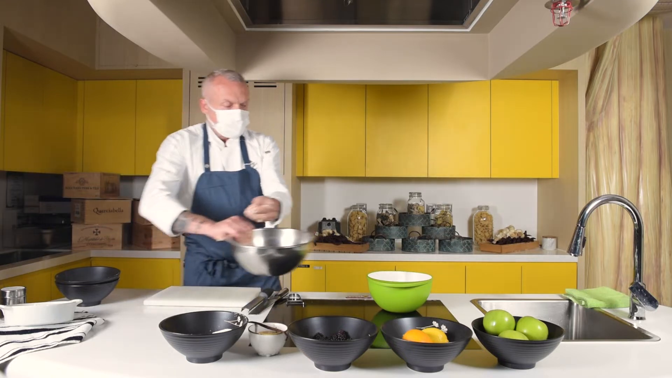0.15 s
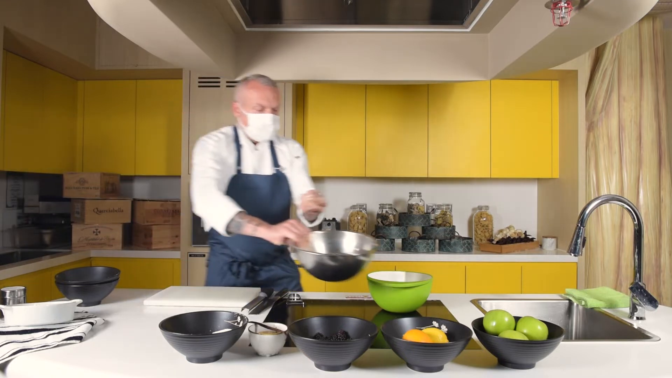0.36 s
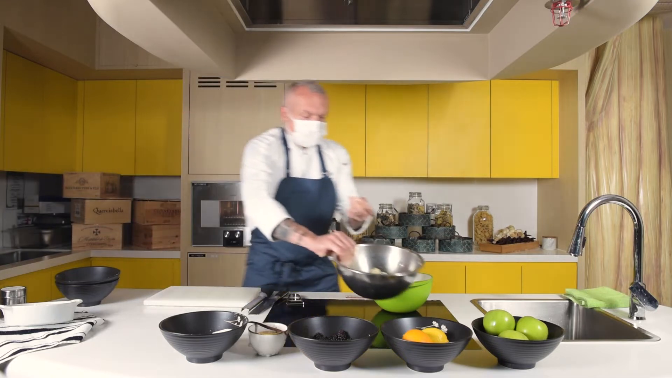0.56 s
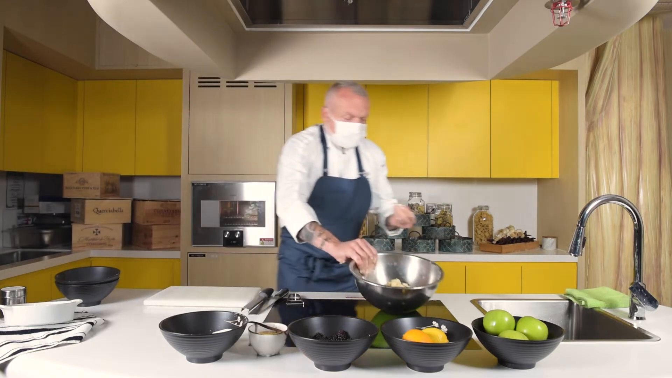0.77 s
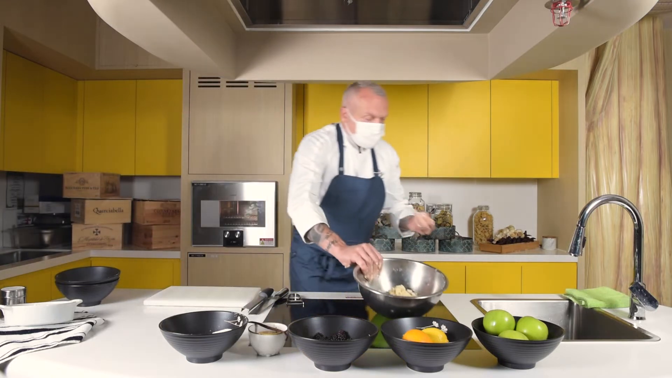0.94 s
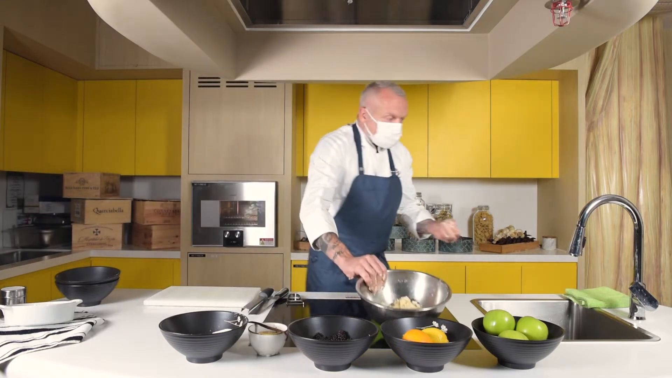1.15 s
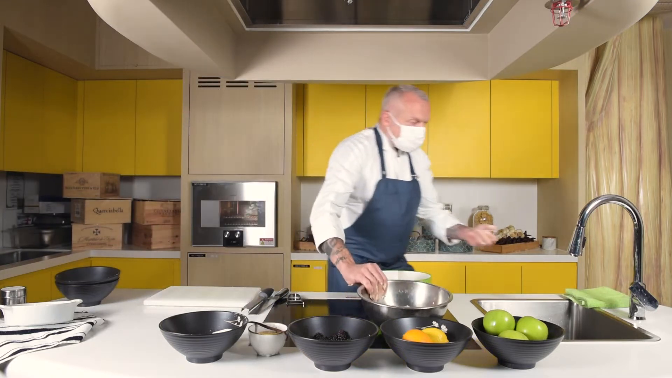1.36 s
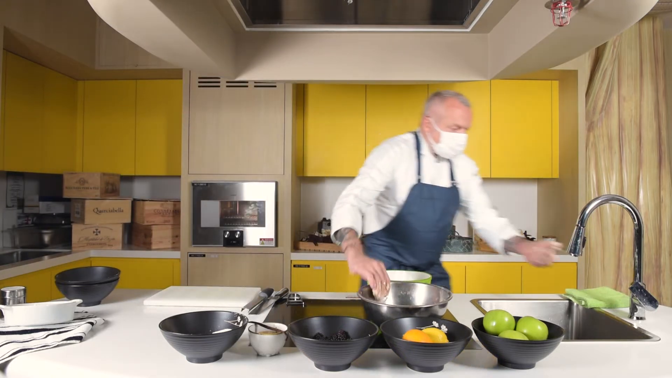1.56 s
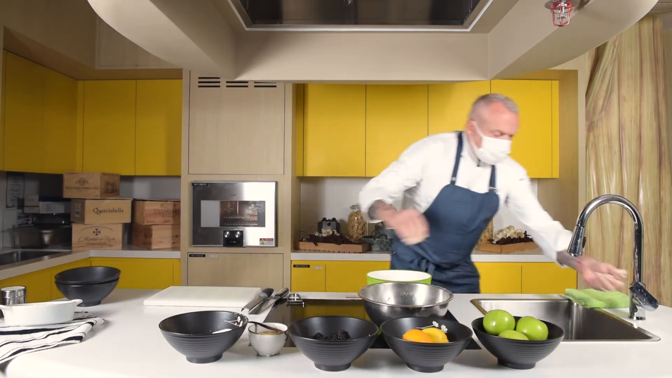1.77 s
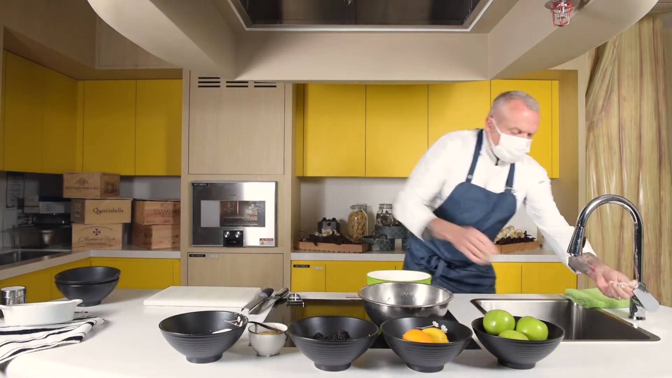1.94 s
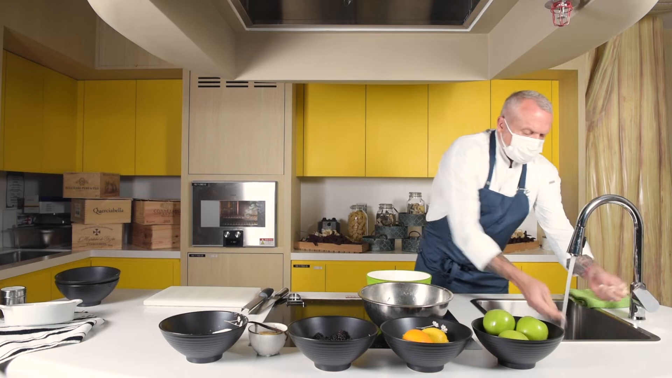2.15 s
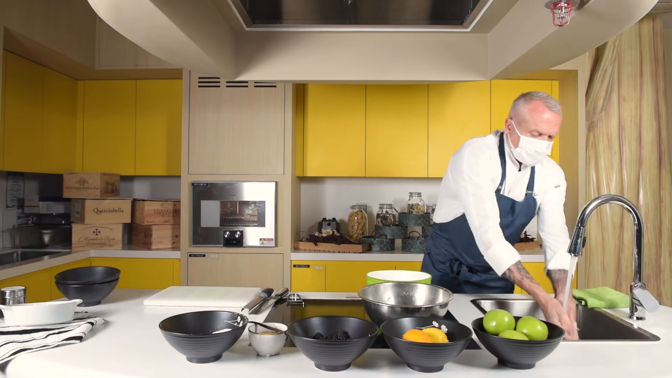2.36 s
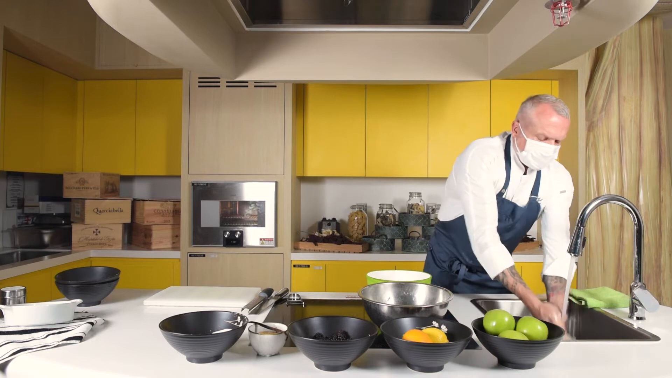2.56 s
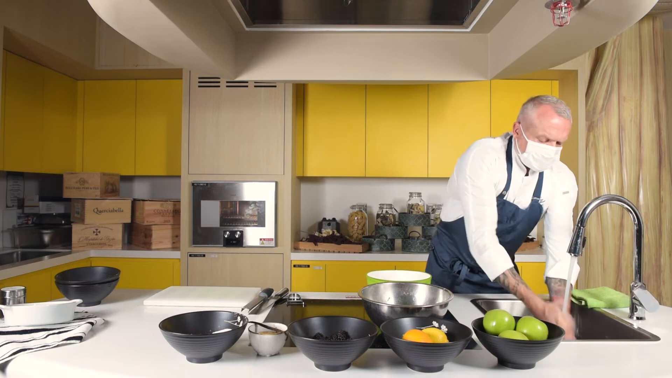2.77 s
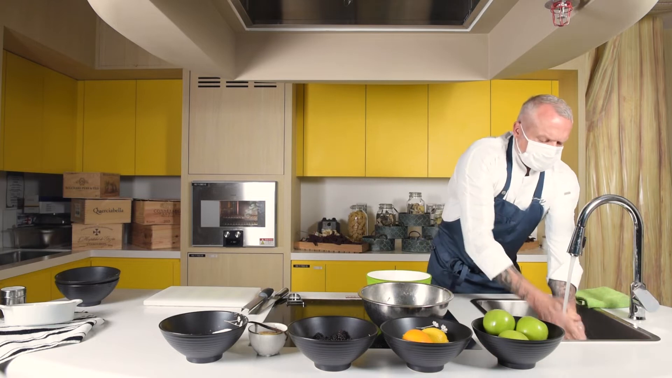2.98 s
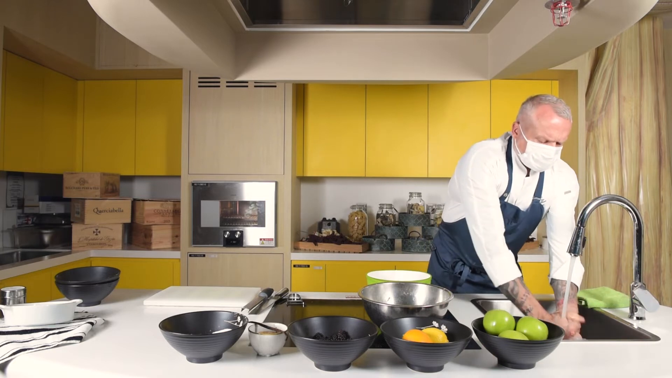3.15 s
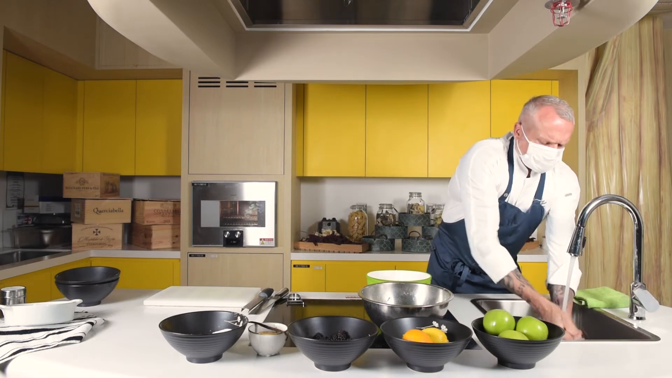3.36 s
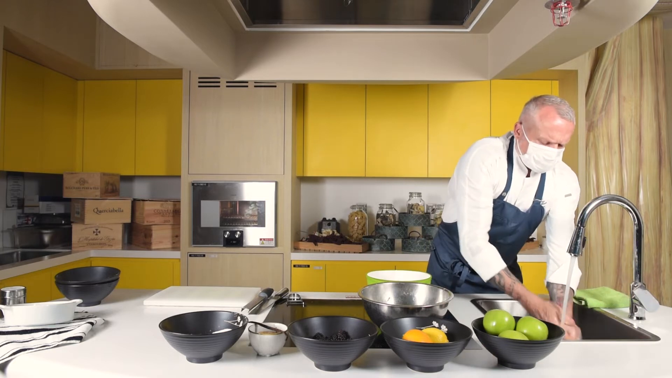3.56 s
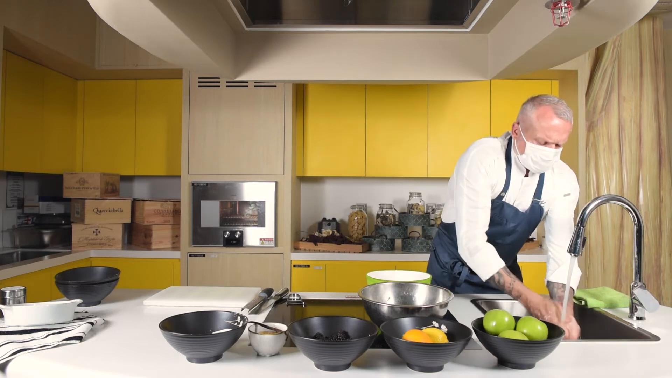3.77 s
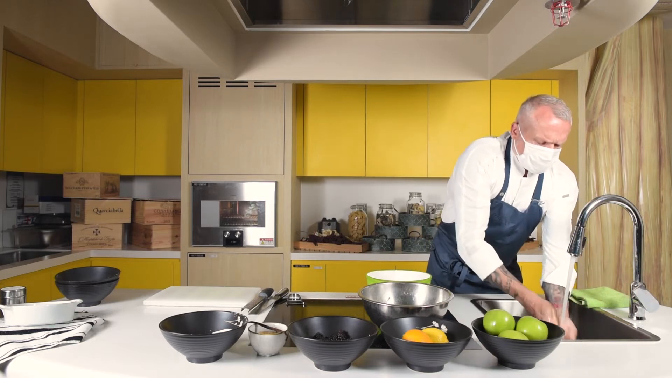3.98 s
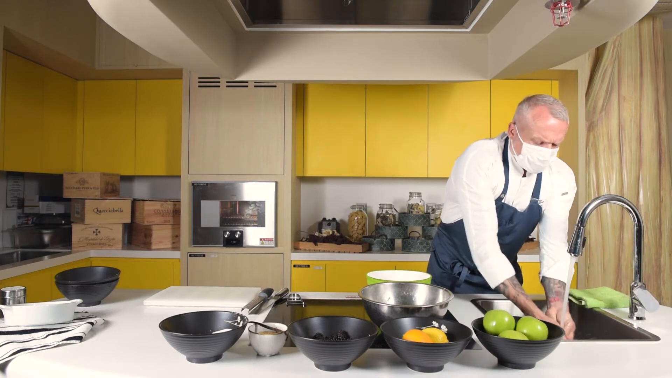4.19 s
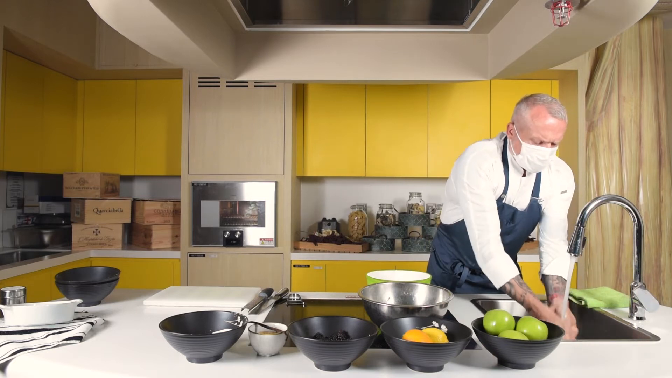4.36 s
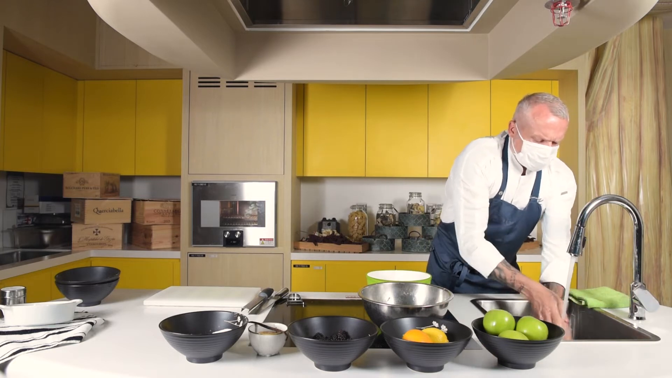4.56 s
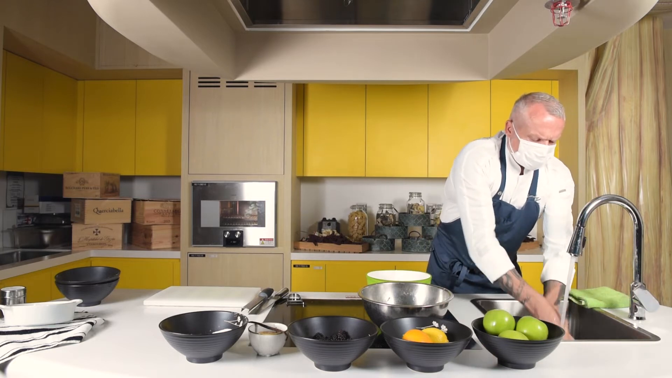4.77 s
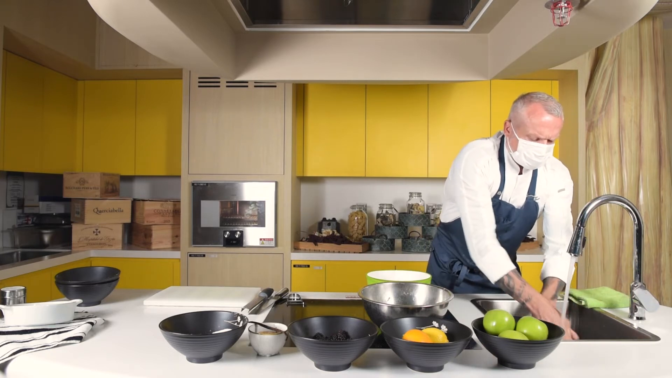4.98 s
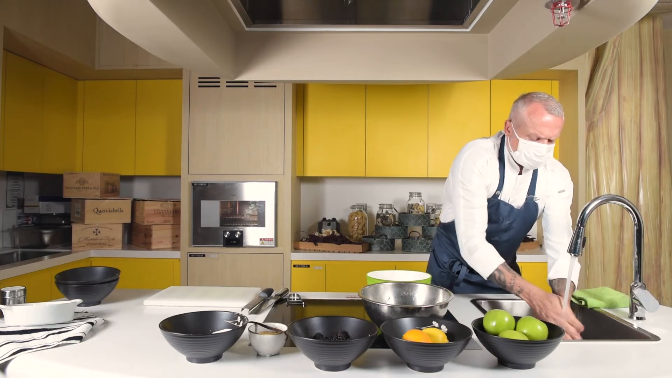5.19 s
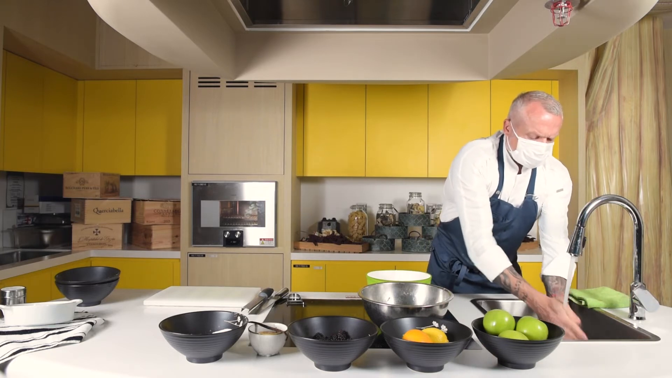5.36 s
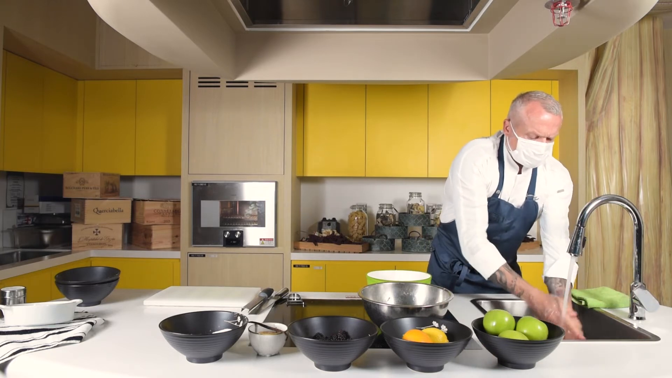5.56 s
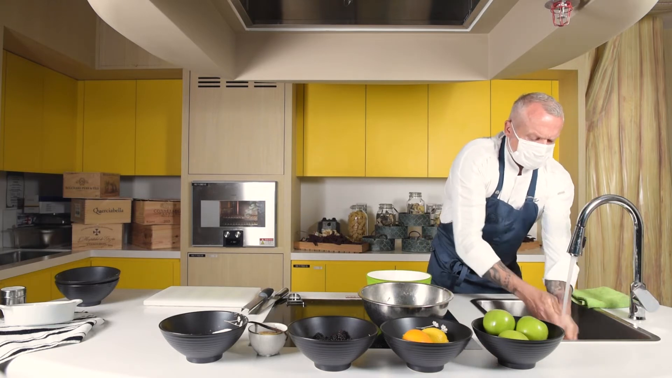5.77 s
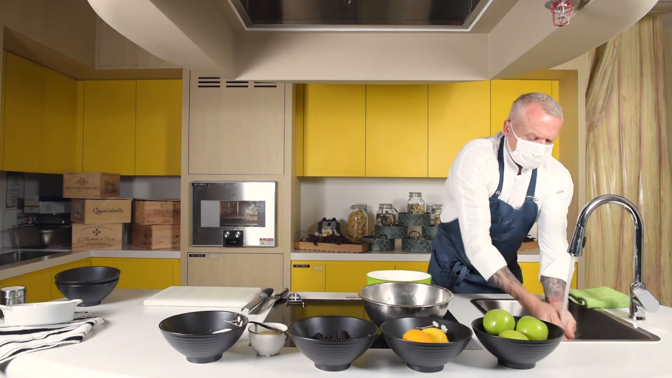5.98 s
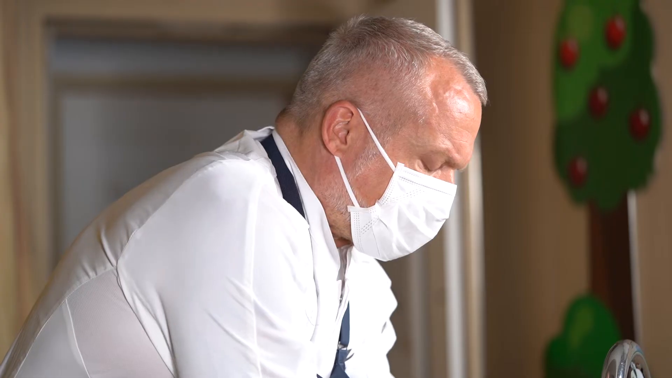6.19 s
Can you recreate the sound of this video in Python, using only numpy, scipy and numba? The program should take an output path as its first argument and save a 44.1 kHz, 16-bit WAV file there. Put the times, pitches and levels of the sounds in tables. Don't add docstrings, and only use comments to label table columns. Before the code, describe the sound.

A faint low ventilation rumble fills a hard-walled kitchen, with slight cloth rustles at the start. At about 0.6 s a steel bowl gets two small taps, then a dull ringing knock at 0.65 that rocks back and forth until 0.8. A lighter tap comes at 0.95. At 1.23 the bowl slams onto stone, by far the loudest event: a clipped, crunchy clang with tiny chattering bounces, a short low-mid ring and grainy room echo, cut off by about 1.8. Near quiet follows. Around 1.95 a tap begins to hiss, with small lever thuds; at 2.2 the jet slaps the steel basin sharply. Until the end at about 6.2 s, much quieter than the slam, thin bright water runs in flickering suppressed bands, with mist, ticking drops and soft thuds as hands rinse; stronger splashes come near 3.15, 4.2 and 5.6, and a last thump at 6.2.

```python
import sys
import numpy as np
from scipy import signal
from scipy.fft import rfft, irfft, next_fast_len
from scipy.io import wavfile
from scipy.ndimage import uniform_filter1d
from numba import njit

SR = 44100
rng = np.random.default_rng(int(sys.argv[2]) if len(sys.argv) > 2 else 0)


def waveform_to_disk(signal):
    frames = np.transpose(np.atleast_2d(signal))
    scaled = np.clip(frames, -1, 1) * 32767
    samples = np.round(scaled).astype(np.int16)
    wavfile.write(sys.argv[1], SR, samples)


def undo_db(level):
    steps = np.asarray(level, float) / 20
    return 10 ** steps


N = 274743


def rms1(x):
    return x / np.sqrt(np.mean(x ** 2))


def unit_energy(x):
    return x / np.sqrt(np.sum(x ** 2))


def shaped(x, gain_at):
    size = next_fast_len(len(x))
    hz = np.arange(size // 2 + 1) * SR / size + 1
    return irfft(rfft(x, size) * gain_at(hz), size)[:len(x)]


def band(x, lo_hz, hi_hz, skirt=0.012):
    def gain_at(f):
        inside = np.minimum(np.log(f / lo_hz), np.log(hi_hz / f))
        return np.clip(inside / skirt / 2 + .5, 0, 1)
    return shaped(x, gain_at)


def colour(table):
    hz, db = np.transpose(table)
    return lambda f: undo_db(np.interp(np.log(f), np.log(hz), db))


def fade(t, t60):
    return np.exp(-np.log(1000) * t / t60)


def add(out, s, x):
    i = int(s * SR)
    out[i:i + len(x)] += x[:N - i]


def walk(rate):
    k = int(SR / rate)
    held = np.repeat(rng.standard_normal(N // k + 1), k)
    return uniform_filter1d(uniform_filter1d(held, k), k)[:N]


def curve(table):
    return np.interp(np.arange(N) / SR, *np.transpose(table))


def swell(s, db, rise, fall):
    t = np.arange(0, N, 64) / SR - s
    return undo_db(db - 20 * np.where(t < 0, -t / rise, t / fall)) ** 2


@njit
def grains(start, hz, cycles, size, glide):
    out = np.zeros(N + 4000)
    for k in range(len(start)):
        step = 2 * np.pi * hz[k] / SR
        keep = np.exp(-hz[k] / SR / cycles[k])
        level, phase = size[k], 0.
        for i in range(min(3999, int(5 * cycles[k] * SR / hz[k]))):
            phase += step
            step = min(step * (1 + glide * hz[k] / SR / cycles[k]), 2.6)
            level *= keep
            out[start[k] + i] += level * np.sin(phase)
    return out[:N]


# lower edge of the band in Hz, time to fall 60 dB in seconds.
KITCHEN_DECAY = [(25, 0.11), (90, 0.42), (180, 0.52), (360, 0.53), (580, 0.51), (800, 0.49), (1500, 0.5),
                 (3000, 0.529), (4750, 0.48), (6000, 0.38), (7600, 0.32), (9600, 0.27), (12200, 0.18),
                 (18000, .1)]


def echoes(kept=1.):
    t = np.arange(SR) / SR
    noise = rng.standard_normal(SR)
    tail = 0
    for (lo, t60), (hi, _) in zip(KITCHEN_DECAY, KITCHEN_DECAY[1:]):
        tail = tail + band(noise, lo, hi, skirt=0.057) * fade(t, kept * t60)
    return tail * (1 - np.exp(-t / 0.0066))


def kitchen(x, kept=0.932):
    return signal.fftconvolve(x, unit_energy(echoes(kept)))[:N]


# frequency in Hz, level in dB per Hz.
AIR_COLOUR = [(20, -30), (50, -24), (80, -21.5), (100, -6.5), (250, 0), (420, -10), (600, -11.5),
              (1160, -14.5), (2060, -24), (4500, -29.5), (5200, -38.5), (15800, -44.5)]
# time in seconds, level in dB.
STIR = [(0.0, -2), (.25, 2), (.7, 3), (1.1, -1), (1.7, -3.5), (2.24, 0), (2.53, 0), (2.81, 1.5),
        (3.0, -1.5), (3.34, 3), (3.57, -0.5), (3.9, 2.5), (4.68, -0.4), (5.2, 2), (5.43, -1), (5.6, 7),
        (5.9, 0.5), (6.23, 2.5)]


def air():
    stir = curve(STIR)
    noise = shaped(rng.standard_normal(N), colour(AIR_COLOUR))
    upper = band(noise, 320, 16000, skirt=0.053)
    out = undo_db(-53 + stir + 2.9 * walk(9)) * rms1(noise - upper)
    out = out + undo_db(-53 + 0.68 * stir + 3.3 * walk(9.7)) * rms1(upper)
    t = np.arange(SR // 8) / SR
    brush = np.hanning(len(t))
    rustles = [(.146, -61.5, 5940, 7860, fade(t, 0.062)), (.57, -62.5, 3800, 15800, brush),
               (1.075, -67, 5900, 7200, brush)]
    for s, db, lo_hz, hi_hz, shape in rustles:
        add(out, s, undo_db(db) * rms1(band(rng.standard_normal(len(t)), lo_hz, hi_hz)) * shape)
    return out


# pitch in Hz, level in dB, time to fall 60 dB in seconds.
RIM = [(40, -19.5, .2), (144, -12, 0.099), (652, 1, 0.064), (770, 3, 0.01), (666, -12, 0.12),
       (854, 4, 0.085), (1293, -22, 0.048), (1400, -12.5, 0.245), (1530, 1, 0.021), (2110, 2.5, 0.02),
       (2820, -10.5, 0.041)]
# pitch in Hz, level in dB, time to fall 60 dB in seconds.
ROCK = [(153, 0.5, 0.13), (540, 1.5, 0.087), (507, -8.5, 0.22), (570, -9.5, 0.38), (613, -14.5, 0.26),
        (677, -16.5, .3), (1747, -19, 0.084)]
# pitch in Hz, level in dB, time to fall 60 dB in seconds.
TAP = [(55.7, -18, 0.2), (150, -13.5, 0.16), (646.7, 7, 0.068), (610, -8.5, 0.3), (681, -4, 0.18),
       (767, 0, 0.045), (861, -9.5, 0.15), (1100, -31, 0.071), (1300, -19, 0.12), (1444, -17, .1),
       (1550, -24, 0.068)]
# pitch in Hz, level in dB, time to fall 60 dB in seconds.
BASE = [(64.75, -15.5, 0.1), (126.8, -13, 0.28), (171.2, 0.5, 0.27), (253.6, 1, 0.28), (282, -8.5, 0.36),
        (332.3, -2, .28), (432.8, -1, .3), (471, -6.5, 0.391), (518.6, 0.5, 0.12), (588, -7.5, .33),
        (647, 0, 0.28), (622.5, -17.5, 0.6), (542, -20, 0.47), (721.4, -12, 0.41), (821, -7.5, .25)]
WOBBLE_DB, WOBBLE_PER_S, WOBBLE_GROWS_S = 3.5, 45, 0.027


def ringing(modes, attack_ms, flutter, hard):
    t = np.arange(SR) / SR

    def loose():
        start = rng.integers(N - SR)
        return flutter[start:start + SR] * np.minimum(t / WOBBLE_GROWS_S, 1)

    depth_db = WOBBLE_DB * (1.25 if hard else 1)
    wander_cycles = 0.1 if hard else 0.12
    ring = 0
    for k, (hz, db, t60) in enumerate(modes):
        sign = (-1) ** k if hard else 1
        level = sign * undo_db(db + depth_db * loose())
        ring = ring + level * np.sin(2 * np.pi * (hz * t + wander_cycles * loose())) * fade(t, t60)
    return ring * (1 - np.exp(-t * 1000 / attack_ms)) ** 2


def contact_noise(crack_db, room_db, kept, grit):
    click = rng.standard_normal(SR) * fade(np.arange(SR) / SR, 0.069)
    noise = undo_db(crack_db) * click + undo_db(room_db) * echoes(kept)
    cepstrum = irfft(np.log(colour(grit)(np.arange(1025) * SR / 2048 + 1)))
    cepstrum[1:1024] *= 2
    cepstrum[1025:] = 0
    response = irfft(np.exp(rfft(cepstrum)))
    return signal.fftconvolve(noise, unit_energy(response))[:SR]


# frequency in Hz, level in dB.
LINGER = [(70, -13.5), (300, -8), (480, 3), (760, 4), (900, -0.5), (4700, -14.5), (5100, -18), (12000, -19)]


def late_echoes():
    t = np.arange(SR) / SR
    rattle = undo_db(1.5 * walk(190)[:SR])
    builds = 1 - np.exp(-(t / 0.075) ** 2)
    return undo_db(13) * rattle * shaped(echoes(0.93), colour(LINGER)) * builds


# start in seconds, level in dB, top frequency in Hz.
CHATTER = [
    (1.226, 0.5, 15100),
    (1.2325, 4, 14000),
    (1.2385, -0.5, 12000),
    (1.2512, -6.5, 6000),
    (1.262, -9.5, 7990),
    (1.273, -5.5, 6000),
]


def chatter(out):
    t = np.arange(SR // 8) / SR
    for s, db, top_hz in CHATTER:
        noise = rng.standard_normal(len(t))
        burst = shaped(noise, lambda f: f / (f + 2500) / (1 + (f / top_hz) ** 4))
        add(out, s, undo_db(db) * burst * fade(t, .014))


def rim_hum(out):
    swell_s, hz = 0.062, 680
    t = np.arange(int(swell_s * SR)) / SR
    hum = rms1(band(rng.standard_normal(len(t)), hz - 70, hz + 70, skirt=.12))
    add(out, 1.16, undo_db(-32) * hum * (t / swell_s) ** 1.5)


# frequency in Hz, level in dB per Hz.
KNOCK = [(30, -15.5), (60, -6.5), (150, -7.5), (320, -25), (620, 1.5), (870, -7), (1050, -16.5), (1500, -5),
         (2200, -13), (3600, -23), (4000, -33.5), (16000, -57)]
# frequency in Hz, level in dB per Hz.
CRACK = [(30, -40), (150, -8.5), (265, -2.5), (630, 1.5), (1040, -6.5), (2000, -13.5), (4410, -17.5),
         (5000, -28.5), (9000, -27.5), (16000, -32)]
# start in seconds, ring level in dB, crack level in dB, room level in dB,
# share of the room echo's length that the suppressor keeps.
BLOWS = [
    (0.594, -40, -49.5, -41.5, 0.57),
    (0.625, -45.5, -43, -37, .6),
    (0.6493, -7.5, -21, -18, 0.71),
    (0.701, -17, -58, -26, 0.42),
    (.729, -10.5, -43, -35, 0.27),
    (.795, -25.5, -54, -54, .4),
    (0.9548, -19.5, -53, -44, 0.83),
    (1.2256, 11.5, 12.5, 10, 0.64),
]


def bowl():
    t, out = np.arange(SR) / SR, np.zeros(N)
    flutter = walk(WOBBLE_PER_S)
    rim, rock, tap, base = (RIM, 0.29), (ROCK, 1.75), (TAP, 1), (BASE, .06)  # modes, contact time in ms
    touches = [tap, tap, rim, rock, rock, rock, tap, base]
    for (s, ring_db, crack_db, room_db, kept), touch in zip(BLOWS, touches):
        hard = touch is base
        noise = contact_noise(crack_db, room_db, kept, CRACK if hard else KNOCK)
        blow = undo_db(ring_db) / 2 * ringing(*touch, flutter, hard) + noise
        if hard:
            gate = np.clip((0.568 - t) / 0.1554, 0, 1)
            blow = (blow + late_echoes()) * gate
        else:
            top_hz = 1800 if touch is tap else 3800
            low_pass = signal.butter(5, top_hz, fs=SR, output="sos")
            blow = signal.sosfilt(low_pass, blow) + undo_db(-17.5) * noise
        add(out, s, blow)
    chatter(out)
    rim_hum(out)
    return out


# start in seconds, level in dB, pitch in Hz,
# time to fall 60 dB in seconds.
THUDS = [(0.601, -24.5, 243.2, 0.0656), (.6092, -26, 243.2, 0.042), (.6255, -23, 592, 0.017),
         (.6428, -21, 742, .018), (0.741, -25, 226, 0.165), (.79, -30.5, 135.1, 0.12),
         (2.053, -34.5, 511, 0.1), (2.072, -32.5, 530, 0.075), (2.059, -34, 326, 0.075),
         (2.071, -37.5, 238, 0.078), (2.21, -42, 108, 0.19), (2.8, -34.5, 279, 0.15),
         (3.336, -37, 177, 0.27), (3.401, -32.5, 150, 0.14), (3.868, -35.5, 191.3, 0.16),
         (3.907, -36, 201, .13), (4.028, -38, 191, 0.13), (5.536, -35, 204, 0.2), (5.62, -41, 188, 0.21),
         (5.954, -42, 300, .1), (6.01, -37, 325, 0.23), (6.055, -32.5, 340, 0.12), (6.073, -38, 327, .1),
         (6.198, -25.5, 217, 0.22)]


def thuds():
    t, out = np.arange(SR // 3) / SR, np.zeros(N)
    for s, db, hz, t60 in THUDS:
        rise = (1 - np.exp(-t * hz / 0.35)) ** 2
        add(out, s, undo_db(db) * np.sin(2 * np.pi * hz * t) * fade(t, t60) * rise)
    out = out + undo_db(-8.5) * kitchen(out)
    damped = np.clip((N - np.arange(N)) / SR / 0.016, 0, 1)
    return band(out * damped, 100, 9000, skirt=0.23)


# frequency in Hz, level in dB per Hz.
WATER_COLOUR = [(1150, 1), (3000, 0), (3750, 1), (4250, 0.5), (5000, -1.5), (6000, -5), (7300, -9),
                (9000, -7), (12200, -9), (15800, -12.5)]
JET_LANDS_S = 2.205


def turbulent_flow(count=20000):
    when, pitch, length, size = rng.random((count, 4)).T
    start, hz, level = (when * N).astype(np.int64), 1100 * 13 ** pitch, undo_db(-3.0 * np.log(size + 0.1))
    drops = grains(start, hz, 0.82 + 4 * length, level, 0.054)
    drops = rms1(shaped(drops, lambda f: np.minimum(f / 3000, 3)))
    falling = np.arange(N) < JET_LANDS_S * SR
    drops = drops * np.where(falling, undo_db(-4.5), 1)
    flow = drops + undo_db(4.0) * rng.standard_normal(N) + undo_db(-8.0) * kitchen(drops)
    flow = shaped(flow, colour(WATER_COLOUR))
    return np.where(falling, shaped(flow, lambda f: 1 / (1 + (f / 10900) ** 4)), flow)


# time in seconds, level in dB.
FLOW = [(1.94, -89.5), (1.99, -55), (2.05, -42.5), (2.2, -36), (2.63, -45.5), (2.69, -33.5), (2.86, -36.5),
        (3.02, -41), (3.4, -36), (3.76, -37.5), (4.42, -34), (4.55, -39.5), (5.02, -34), (5.3, -43.5),
        (5.5, -36.5), (5.96, -40), (6.1, -34.5), (6.23, -35)]
# peak time in seconds, level in dB,
# rise and fall over 20 dB in seconds, extra level of the finest hiss in dB.
MISTS = [(2.21, -30, 0.013, 0.13, 0), (2.37, -47, 0.046, 0.12, 5), (2.45, -54.5, 0.051, 0.078, 5.5),
         (2.54, -52.5, 0.095, 0.066, 3.5), (2.7, -47, 0.12, 0.25, 1.5), (2.8, -44.5, 0.018, 0.064, 0),
         (2.94, -51, 0.3, 0.083, 4), (3.199, -48, 0.25, 0.033, -0.5), (3.29, -46.5, 0.19, 0.17, 1.5),
         (3.41, -46, 0.23, 0.072, 2), (3.54, -45, 0.072, 0.21, 1.5), (3.65, -55.5, 0.11, 0.12, 0.5),
         (3.85, -48, 0.18, 0.255, 0.34), (4.33, -44, 0.086, 0.22, 1), (4.419, -42, 0.1, .12, 3),
         (4.77, -55.5, 0.064, 0.063, 7), (4.92, -49.5, .15, 0.24, -3.5), (5.1, -43, 0.28, 0.1, -2.5),
         (5.33, -45.5, 0.35, 0.17, -2), (5.6, -44, 0.047, 0.14, -3.5), (5.77, -45, 0.21, 0.074, -13.5),
         (5.88, -42.5, 0.26, 0.14, -5), (6.065, -48.5, 0.033, 0.026, -3), (6.165, -58, .02, .4, 2.5)]
# peak time in seconds, level in dB, centre in Hz,
# rise and fall over 20 dB in seconds.
SPLASHES = [(2.208, -18.5, 4400, 0.0087, 0.15), (2.21, -25, 1900, 0.0094, 0.12),
            (2.212, -47, 1310, .01, 0.069), (3.31, -56, 1290, .04, .12), (6.015, -43.5, 1703, 0.022, 0.17),
            (2.25, -25.5, 2990, 0.06, 0.22), (2.81, -35, 3370, 0.27, 0.425), (5.75, -49, 1880, 0.47, 0.34),
            (3.17, -30.5, 3870, 0.29, 0.17), (3.195, -35.5, 3430, 0.18, 0.129),
            (3.615, -43, 1950, 0.012, 0.22), (3.885, -37.5, 3400, 0.16, 0.2), (3.9, -51, 1300, 0.035, 0.18),
            (4.09, -42, 2702, 0.16, 0.2), (4.155, -32, 3100, 0.104, 0.15), (4.21, -35, 2100, 0.046, .06),
            (4.24, -28.5, 1810, 0.06, 0.075), (4.252, -35, 1295, 0.015, 0.079),
            (4.11, -45.5, 1692, 0.044, 0.074), (4.26, -35.5, 6740, 0.047, 0.16),
            (4.275, -33.5, 3260, 0.11, 0.095), (4.6, -44.5, 2100, 0.069, 0.114),
            (4.86, -39, 3335, 0.075, 0.129), (5.6, -27, 4130, 0.035, 0.224), (5.62, -36, 2970, 0.061, 0.23),
            (3.45, -44, 3403, 0.89, 0.54), (6.018, -31.5, 2620, 0.019, 0.08), (6.055, -39, 2500, .04, 0.16),
            (6.09, -52, 3300, 0.089, 0.24), (6.21, -43, 1650, 0.016, .05)]
EDGES_HZ = [1150, 1500, 1900, 2400, 3020, 3810, 6000, 7600, 12200, 15800]
JET_PASS_DB = [-48, -44.5, -42.5, -37.5, -20, 0.16, -8.5, -7.5, -22.5]
MIST_PASS_DB = [-40, -42, -42, -40, -40, -2.5, -1, 8.5, -2]
DRAIN_DB = [-67, -63, -62, -60.5, -62.5, -67, -57, -51.5, -76.5]


def water():
    t = np.arange(N) / SR
    flow = turbulent_flow()
    jet, surge, out = undo_db(curve(FLOW)) ** 2, walk(35), 0
    falling = np.arange(N) <= JET_LANDS_S * SR
    free_s = t - 1.955
    drain = np.clip(free_s / 0.23, 0, 1) ** 2
    bands = zip(EDGES_HZ, EDGES_HZ[1:], JET_PASS_DB, MIST_PASS_DB, DRAIN_DB)
    for lo, hi, jet_db, mist_db, drain_db in bands:
        bright_db = (11 - 23 * free_s) * falling * (lo >= 6000)
        steady = undo_db(jet_db + bright_db) ** 2 * jet + undo_db(drain_db) ** 2 * drain
        power = 0
        for s, db, rise, fall, fine_db in MISTS:
            power = power + swell(s, db + mist_db + fine_db * (hi == EDGES_HZ[-1]), rise, fall)
        for s, db, hz, rise, fall in SPLASHES:
            off = np.log2(np.sqrt(lo * hi) / hz)
            power = power + swell(s, db - max(off * 21, -off * 55), rise, fall)
        patchy = walk(21.963)
        steady = steady * undo_db((3.5 if hi < 3100 else 1.73) * patchy) ** 2
        gain = np.sqrt(steady + np.repeat(power, 64)[:N] * undo_db(1.5 * patchy) ** 2)
        out = out + gain * rms1(band(flow, lo, hi)) * undo_db(1.4 * surge)
    return out * (np.arange(N) > FLOW[0][0] * SR)


# start in seconds, level in dB, pitch in Hz.
TICKS = [(2.2074, -8, 5170), (2.2079, -10, 4300), (2.2106, -7.5, 4700), (2.2127, -6, 5100),
         (2.2497, -11.5, 6200), (2.2524, -15, 5782), (2.3583, -15.5, 4300), (2.6783, -22, 4790),
         (2.799, -14, 8700), (2.8341, -19.5, 5091), (3.0149, -22.5, 7400), (3.1271, -20.5, 6200),
         (3.1452, -19, 5100), (3.1564, -25, 4810), (3.1629, -23, 4700), (3.1678, -19, 5400),
         (3.1735, -16, 4600), (3.1868, -25.5, 7270), (3.1902, -16.5, 4400), (3.2017, -16, 4370),
         (3.28, -18.5, 10280), (3.3824, -11, 10000), (3.524, -16, 5610), (3.6288, -19, 5350),
         (3.6328, -14, 5300), (3.6756, -18, 4430), (3.8805, -17, 4100), (4.1415, -16, 4450),
         (4.1505, -18, 5404), (4.1544, -15, 5000), (4.2107, -26, 4784), (4.2507, -20.5, 5590),
         (4.2551, -15, 4760), (4.2623, -16, 5200), (4.3239, -21.5, 6500), (4.349, -21, 6900),
         (4.4195, -16, 10780), (4.8245, -28, 5220), (4.8415, -17.5, 4500), (4.9079, -19, 5100),
         (4.9505, -22, 7820), (4.991, -18, 9110), (4.9961, -24, 5100), (5.0356, -20, 5490),
         (5.0451, -19.5, 7290), (5.5819, -17.5, 5100), (5.585, -17.5, 5100), (5.5951, -13, 4560),
         (5.6171, -17.5, 5430), (5.6253, -14.5, 4730), (5.65, -14, 4410), (5.865, -18.5, 9380),
         (6.0129, -19.5, 4930), (6.0206, -21, 4100), (6.0625, -19, 4470), (6.0813, -18, 4575),
         (6.0889, -19.5, 4410), (6.0951, -29, 4500), (6.1057, -20, 4599), (6.1464, -21, 5440)]
# start in seconds, level in dB, pitch in Hz.
DROPS = [(2.2034, -18, 4010), (2.2497, -4.5, 4130), (2.3639, -19.5, 4390), (2.4042, -20.5, 3360),
         (2.8061, -20.0, 4310), (2.8733, -29, 3960), (3.285, -14, 11240), (3.3285, -22.5, 10510),
         (3.334, -24.0, 9170), (3.3463, -32, 3880), (3.5191, -20.5, 10720), (3.6934, -22, 4310),
         (3.772, -22, 4460), (3.9483, -23, 4050), (3.9678, -27, 4220), (4.0949, -19, 5680),
         (4.185, -21.5, 5210), (4.2681, -17.5, 4690), (4.4053, -24, 4130), (4.4557, -24, 4390),
         (4.4948, -24, 5440), (4.9506, -20.5, 10080), (4.9818, -22, 4280), (4.9886, -17, 4350),
         (5.0451, -24, 4820), (5.1334, -24.0, 8530), (5.231, -19.5, 4350), (5.2626, -29.5, 5100),
         (5.3137, -24.0, 9130), (5.3355, -22, 5300), (5.3627, -22.5, 7800), (5.4036, -25.5, 4520),
         (5.4216, -20, 7540), (5.4475, -36, 4520), (5.5804, -14.5, 4050), (5.5973, -11, 4050),
         (5.618, -10, 4260), (5.6265, -16, 5040), (5.7, -19.5, 4780), (5.7492, -21, 8430),
         (5.9245, -25, 10770), (6.0273, -19, 5430), (6.0406, -21.0, 5730), (6.2094, -29, 4050)]
# start in seconds, peak level in dB.
SPITS = [(2.5178, -32), (3.1858, -22.5), (3.2548, -31), (3.2696, -26), (3.3722, -26.5), (3.4171, -22),
         (3.49, -35.5), (3.539, -26), (4.3089, -31), (4.3294, -27), (4.4184, -19), (4.4391, -28),
         (4.7636, -36), (4.9081, -31.5), (4.9901, -26), (5.0849, -23), (5.3339, -26), (5.6293, -28.5),
         (5.7744, -31), (5.862, -22), (6.0594, -28), (6.157, -32.5)]


def ticks():
    s, db, hz = np.transpose(TICKS + DROPS)
    start = (s * SR).astype(np.int64) - 8
    out = grains(start, 1. * hz, 2.2 + 0 * s, undo_db(db + 1.5), 0.019)
    s, db = np.transpose(SPITS)
    start = (s * SR).astype(np.int64)
    out = out + grains(start, 12510 + 0 * s, 1.6 + 0 * s, undo_db(db + 1), 0.)
    return band(out + undo_db(-6) * kitchen(out, 0.32), 3020, 15800)


# start in seconds, peak level in dB, centre in Hz, half width in octaves.
SLAPS = [(2.2069, 5, 3950, 0.54), (2.228, -20, 4427, 0.5), (2.251, 0.5, 4230, 0.94),
         (2.37, -14.5, 9840, 0.44), (2.424, -18.5, 8600, 0.44), (2.446, -12, 3900, 0.64),
         (2.521, -18.5, 9920, 0.44), (2.678, -15, 4540, 0.97), (2.796, -10.5, 9070, 0.17),
         (3.0126, -8.5, 7200, 0.39), (3.151, -5, 4300, 0.4), (3.19, -20, 12120, 0.36),
         (3.372, -18, 6000, 0.79), (3.521, -11.5, 5630, 0.43), (3.627, -8, 4795, 0.68),
         (3.879, -10, 3740, 0.34), (4.139, -8.5, 3940, 0.67), (4.152, -11, 4870, 0.244),
         (4.249, -5, 5010, 0.72), (4.42, -17, 10080, 0.58), (4.679, -10.5, 4080, 0.11),
         (4.906, -12.5, 4320, 0.28), (4.987, -11, 7030, 0.82), (5.362, -15, 8510, 0.447),
         (5.575, -7, 4400, 0.26), (5.594, -2.5, 3996, 0.21), (6.0126, -12, 2650, 0.22),
         (6.065, -29.5, 13000, 0.45), (6.089, -8, 4180, 0.12), (6.144, -8.5, 5480, 0.24)]


def slaps():
    t, out = np.arange(SR // 2) / SR, np.zeros(N)
    burst = fade(t, 0.039) * (1 - np.exp(-t / 0.002))
    for s, db, hz, octaves in SLAPS:
        def spread(x):
            return rms1(shaped(x, lambda f: 1 / (1 + (np.log2(f / hz) / octaves) ** 4)))
        lumps = np.repeat(rng.standard_normal(len(t) // 40 + 1), 40)[:len(t)]
        spatter = rng.standard_normal(len(t)) * undo_db(3.3 * lumps)
        room_t60 = np.interp(hz, *np.transpose(KITCHEN_DECAY))
        room = undo_db(-15) * fade(t, room_t60) * (1 - np.exp(-t / 0.0061))
        slap = spread(spatter) * burst + room * spread(rng.standard_normal(len(t)))
        add(out, s, undo_db(db - 11.5) * slap)
    return band(out, 1000, 15800)


def scene():
    return (air() + bowl() + thuds() + water() + ticks() + slaps())[None]


def band_limit(x):
    return signal.sosfilt(signal.butter(12, 15900, fs=SR, output="sos"), x)


def record(dry):
    clipped = np.clip(dry[0], -.98, .98)
    clipped = 1.015 * shaped(clipped, lambda f: 1 / (1 + (29 / f) ** 2))
    t = np.arange(int(0.066 * SR)) / SR
    ahead = rng.standard_normal(len(t)) * fade(t, 0.45) * np.cos(np.pi / 2 * t / t[-1]) ** 2.5
    smear = signal.fftconvolve(clipped, unit_energy(ahead)[::-1])[len(t):]
    smear = shaped(np.append(smear, 0), lambda f: 1 / (1 + f / 8000) / (1 + (420 / f) ** 2))
    return band_limit(np.clip(clipped + undo_db(-17.0) * smear, -1, 1)[None])


dry = scene()
out = record(dry)
waveform_to_disk(out)
```